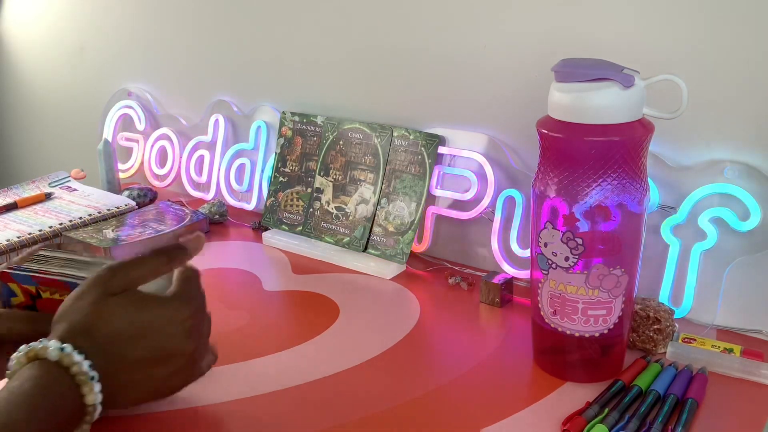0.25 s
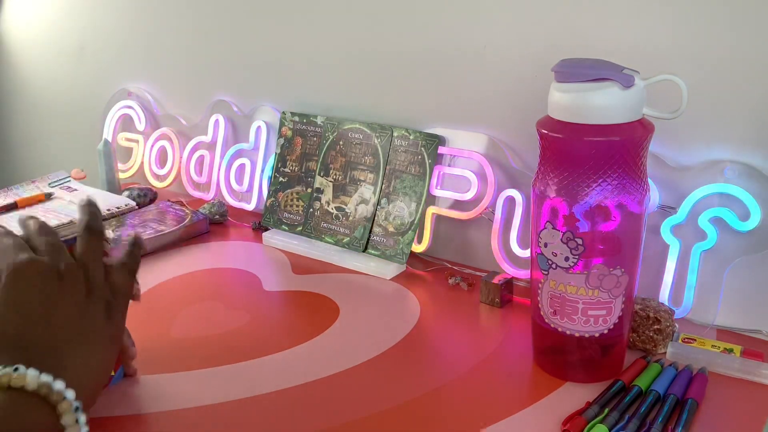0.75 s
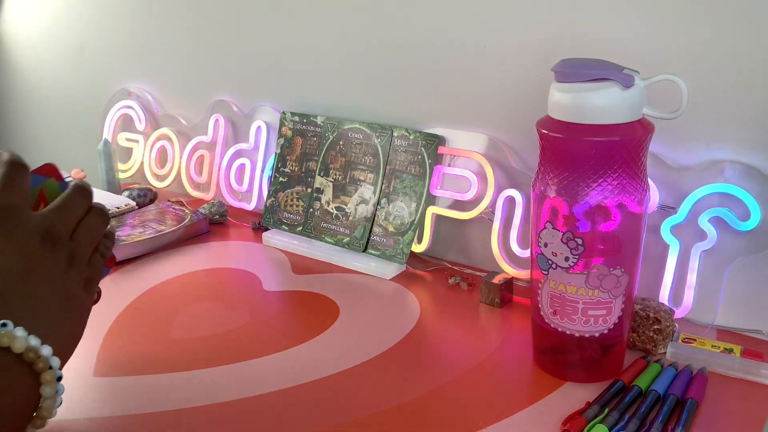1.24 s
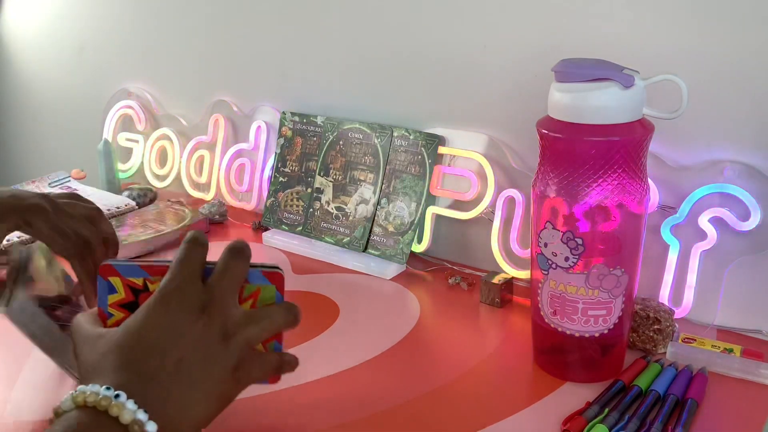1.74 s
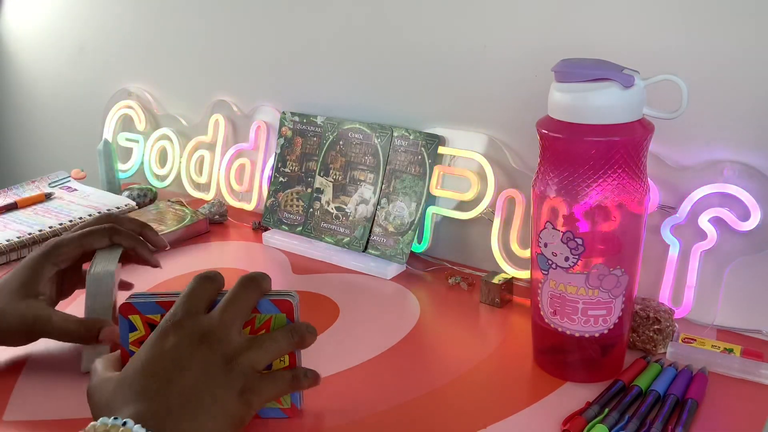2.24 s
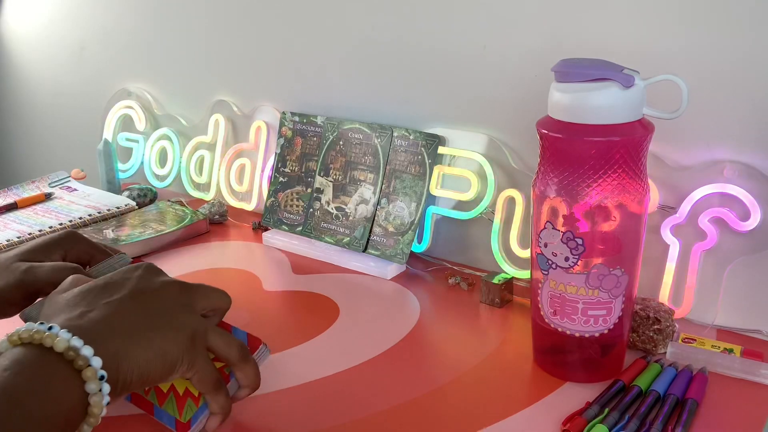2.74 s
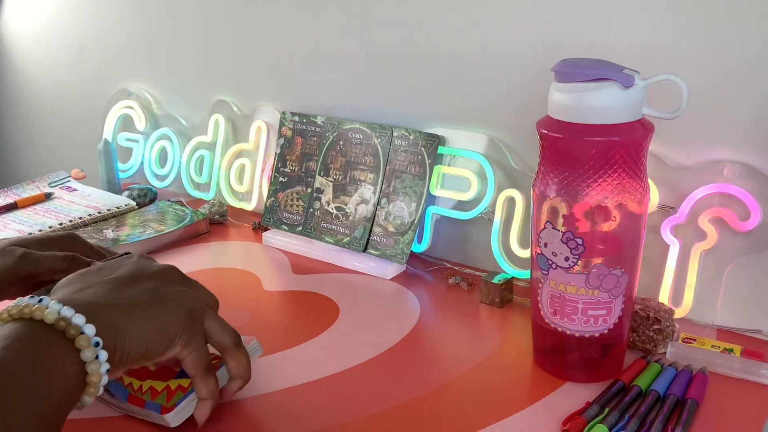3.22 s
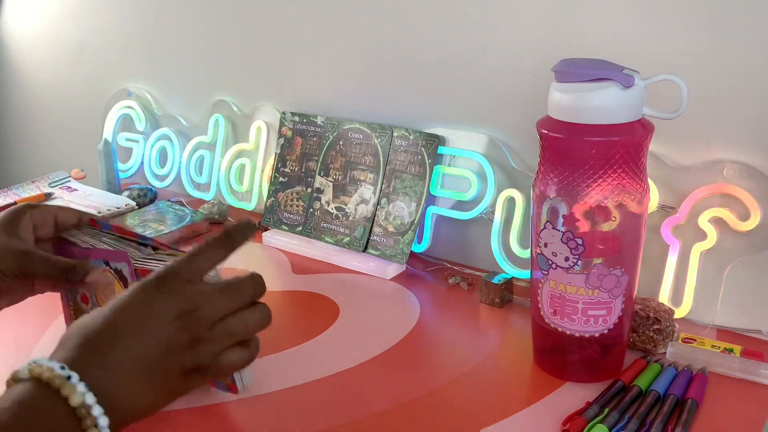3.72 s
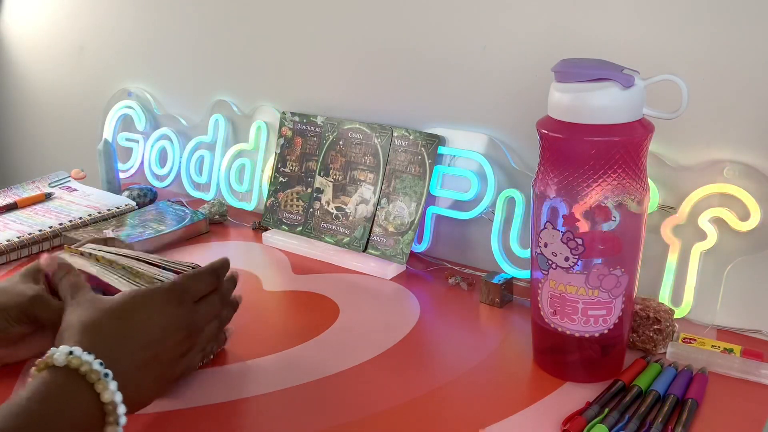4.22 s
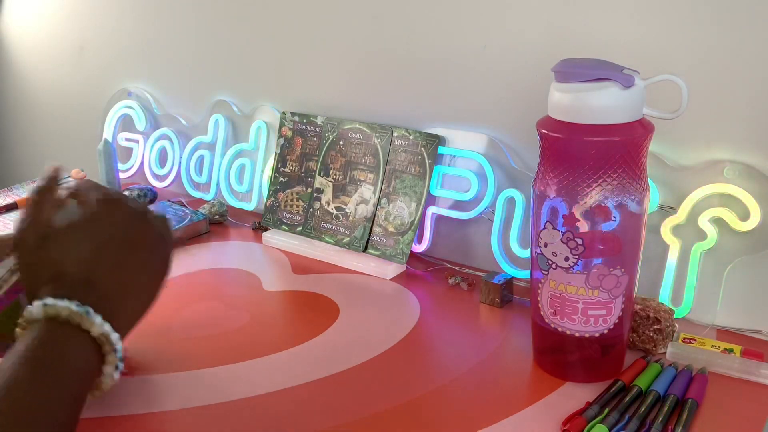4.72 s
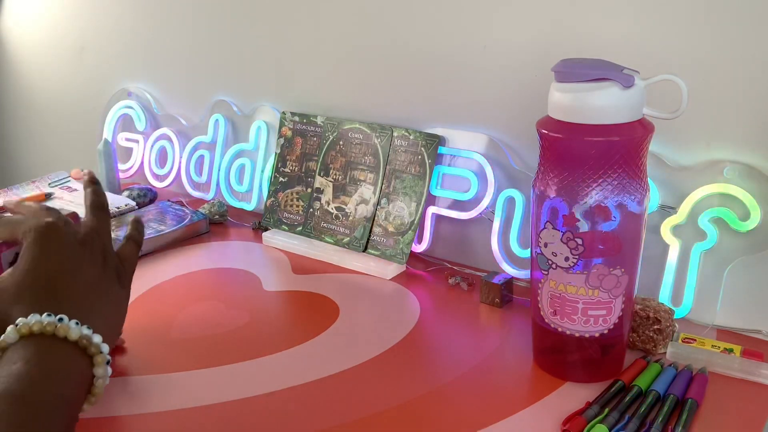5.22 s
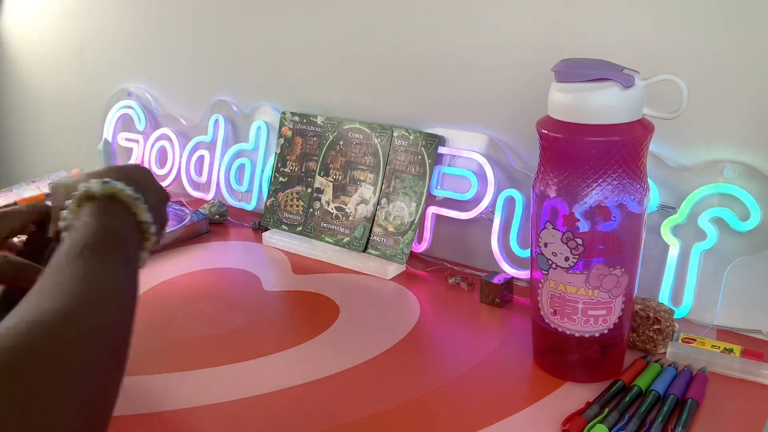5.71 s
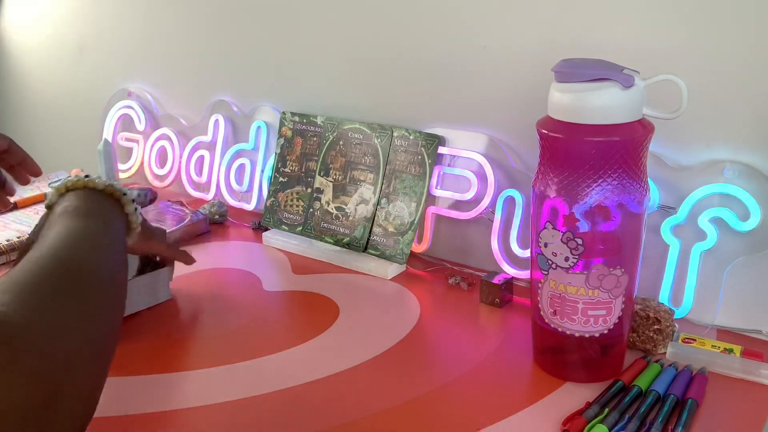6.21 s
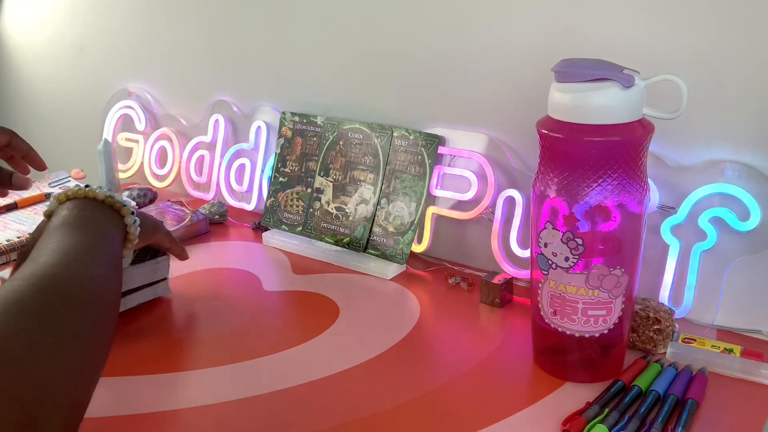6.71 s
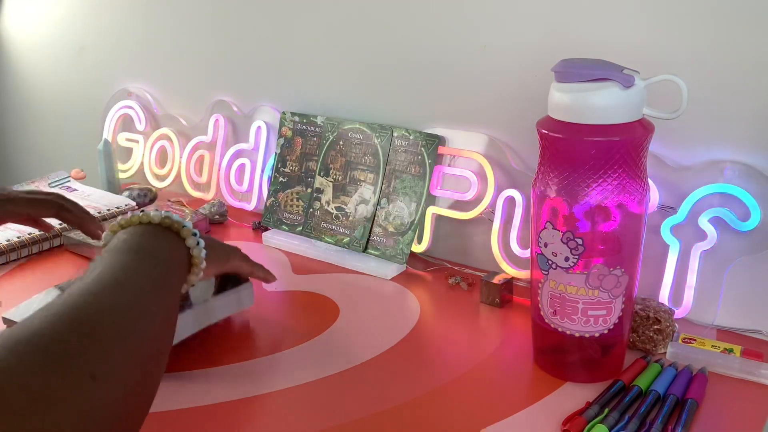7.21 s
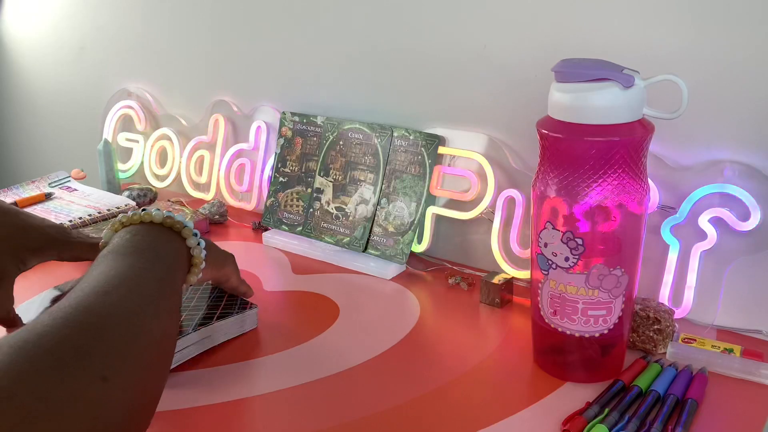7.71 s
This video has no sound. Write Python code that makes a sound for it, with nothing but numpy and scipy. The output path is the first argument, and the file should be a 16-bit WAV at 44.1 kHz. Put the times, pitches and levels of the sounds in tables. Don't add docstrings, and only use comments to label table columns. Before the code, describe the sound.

Cards rub and hiss in the hands, slap together in short cascades, then snap rapidly one after another in a riffle. More slaps and squaring taps follow, with tiny bright bead clicks from a bracelet. After a pause a heavy slap booms the desk top, and the end has isolated wooden thuds and faint scrapes. Close stereo pickup, short room echo, low hum and soft hiss beneath.

```python
import sys
import numpy as np
from scipy import signal
from scipy.io import wavfile
from scipy.ndimage import uniform_filter1d

SR = 44100
rng = np.random.default_rng(int(sys.argv[2]) if len(sys.argv) > 2 else 0)


def how_loud(loudness_db):
    steps = np.asarray(loudness_db, float) / 20
    return 10 ** steps


def unload_audio(sound):
    columns = np.transpose(np.atleast_2d(sound))
    steps = np.round(np.clip(columns, -1, 1) * 32767)
    wavfile.write(sys.argv[1], SR, steps.astype(np.int16))


N = 350595
CARD_LAG, BEAD_LAG, RIFFLE_LAG = 3, -8, -1


def evened(x):
    return x / np.sqrt(np.mean(x ** 2) + 1e-20)


def peaked(x):
    return x / abs(x).max()


def read(points, hz):
    f, value = np.transpose(points)
    return np.interp(np.log(hz + 1), np.log(f + 1), value)


def resonated(x, hz, q):
    return signal.lfilter(*signal.iirpeak(hz, q, SR), x)


def add(mix, start_s, sound, pan_db=0., lag=0):
    for ear, side in zip(mix, (1, -1)):
        first = round(start_s * SR) + (lag if side > 0 else 0)
        part = ear[max(first, 0):][:len(sound)]
        part += how_loud(side * pan_db / 2) * sound[:len(part)]


def click(points, size=1024):
    hz = abs(np.fft.fftfreq(2 * size, 1 / SR))
    log_gain = np.log(how_loud(np.maximum(read(points, hz), -100)))
    h = np.fft.ifft(np.exp(np.conj(signal.hilbert(log_gain)))).real[:size]
    return h / np.linalg.norm(h)


def ring(modes, size=22000):
    t = np.arange(size) / SR
    return peaked(sum(how_loud(db - 60 * t / t60) * np.sin(2 * np.pi * hz * t) for hz, db, t60 in modes))


def grit(lumps_db, size=N):
    lumps = np.minimum(rng.exponential(1, size // 24 + 1), 4)
    force = np.repeat(how_loud(lumps_db * lumps), 24)[:size]
    return evened(force * rng.standard_normal(size))


def cascade(spread_s, rise_s, lumps_db):
    t, lead_s = np.arange(4096) / SR, 4 * rise_s
    crowding = np.exp((t - lead_s) / rise_s)
    thinning = np.exp(-np.maximum(t - lead_s - 0.37 * spread_s, 0) / spread_s)
    end_fade = signal.windows.tukey(4096, .1) ** (t > .04)
    return lead_s, grit(lumps_db, size=4096) * np.minimum(crowding, thinning) * end_fade


def gesture(start_s, hold_s, level_db, swell_db_per_s, fade_db_per_s):
    t = np.arange(0, N, 64) / SR
    swell = swell_db_per_s * np.maximum(start_s - t, 0)
    return level_db - swell - fade_db_per_s * np.maximum(t - start_s - hold_s, 0)


def strongest(gestures):
    level_db = np.max([gesture(*g) for g in gestures], 0)
    return how_loud(np.interp(np.arange(N), np.arange(0, N, 64), level_db))


# freq_hz [Hz], density_db [dB per Hz]
AIR_SPECTRUM = [(15, -30), (25, -13.5), (74, -2), (177, -18.5), (245, -23.5), (288, -32.5), (1830, -48.5),
                (4480, -51.5), (14800, -49), (16500, -67.5)]
# freq_hz [Hz], likeness [0-1]
AIR_LIKENESS = [(60, 0.93), (240, 0.89), (950, 0.48), (3770, 0.06), (15000, 0.99)]


def air():
    frames, hz = N // 512 + 5, np.fft.rfftfreq(2048, 1 / SR)
    a, b, c, d, drift = rng.standard_normal((frames, 1025, 5)).T
    drift = evened(uniform_filter1d(uniform_filter1d(drift, 20, 0), 8, 1))
    same, left = read(AIR_LIKENESS, hz)[:, None], a + 1j * b
    right = same * left + np.sqrt(1 - same ** 2) * (c + 1j * d)
    z = np.array([left, right]) * how_loud(read(AIR_SPECTRUM, hz)[:, None] + 0.51 * drift)
    return how_loud(-60) * evened(signal.istft(z, nperseg=2048, noverlap=1536)[1][:, :N])


# peak_s [s], flex_db [dB],
# palm_rub_db [dB], swell_db_per_s [dB/s], fade_db_per_s [dB/s]
STROKES = [
    (0.0, -37, -49.5, 100, 114),
    (.8, -49.5, -60, 300.5, 90),
    (1.9, -63.5, -53, 65.5, 30.5),
    (3.04, -35.5, -44, 247.5, 43.5),
    (3.24, -35.5, -35, 171, 106.5),
    (4.05, -44.5, -50.5, 40.5, 46),
    (4.37, -49, -57.5, 28, 72.5),
    (5.24, -47, -59, 300.5, 102),
    (6.12, -68, -57, 60.5, 61.5),
    (7.95, -86, -58, 85.5, 100),
]
# start_s [s], hold_s [s], hiss_db [dB], swell_db_per_s [dB/s], fade_db_per_s [dB/s]
DRAGS = [(.01, 0.29, -60, 300, 482), (.45, .2, -67.5, 248, 56), (.8, 0.043, -59, 150, 86),
         (1.58, 0.0074, -54, 460, 256), (2.03, 0.0042, -53, 147, 294.5), (2.135, .11, -69, 900, 201.5),
         (2.31, 0.051, -66.5, 605, 94), (2.545, 0.041, -65, 695.5, 196.5), (2.87, 0.56, -35, 739, 240),
         (3.45, .01, -45, 499.5, 24), (3.97, 0.0025, -26, 229.5, 285), (4.21, 0.0091, -35, 282, 208),
         (4.44, .21, -57.5, 699, 192), (4.8, 0.13, -67, 100, 367.5), (5.12, 0.24, -68, 313.5, 356.5),
         (5.95, 0.074, -55, 326, 201)]
# freq_hz [Hz], density_db [dB per Hz]
RUB = [(120, -27), (300, -5), (600, -6), (900, -10), (1500, -27.5), (4000, -53)]
# freq_hz [Hz], density_db [dB per Hz]
FLEX = [(150, -19), (300, -3), (600, 1), (1000, -1.5), (1600, 0), (2400, -6.5), (3200, -20), (5000, -41.5),
        (9000, -74.5)]
# freq_hz [Hz], density_db [dB per Hz]
EDGE = [(900, -30.5), (2500, -2.5), (4000, -4), (8000, 3.5), (12000, 2.5), (16000, -5.5), (18000, -35)]
# freq_hz [Hz], level_db [dB], t60_s [s]
TOP = [(94, -9, 0.29), (137, 5.5, 0.079), (227, 1.5, 0.054), (278, -11.5, 0.19), (323.5, -8.5, 0.19),
       (366, -9, 0.15), (539, -11.5, 0.42), (759.3, -13, 0.091)]
# freq_hz [Hz], level_db [dB], t60_s [s]
SWAY = [(53.8, 4.5, 0.26), (56, -2.5, 0.2)]


def slide():
    rub = strongest((s, 0, rub_db, *pace) for s, _, rub_db, *pace in STROKES)
    flex = strongest((s, 0, flex_db, *pace) for s, flex_db, _, *pace in STROKES)
    hiss = strongest(DRAGS)
    desk = ring(TOP) + 0.15 * ring(SWAY)
    shake = evened(signal.oaconvolve(grit(1.4) * rub, desk)[:N])
    out = how_loud(6.0) * shake * np.std(rub) * np.array([[how_loud(.7)], [how_loud(-.7)]])
    for level, colour, lumps_db, apart in ((rub, RUB, 3., .45), (flex, FLEX, 4., .8), (hiss, EDGE, 2.8, .4)):
        shared, left, right = (signal.oaconvolve(grit(lumps_db), click(colour))[:N] for _ in range(3))
        ports = np.array([np.roll(shared, -2), shared]) + apart * np.array([left, right])
        out = out + how_loud(-3.5) * level * ports
    return out


# freq_hz [Hz], density_db [dB per Hz]
CRACK = [(1200, -24), (2600, -5.5), (4000, -0.5), (6000, -9.5), (9000, -16.5), (16000, -34)]


def land(out, start_s, level_db, pitch_hz, crack_db, spread_s, q, rise_s):
    lead_s, drive = cascade(spread_s, rise_s, lumps_db=3.5)
    body = signal.fftconvolve(drive, click(FLEX))
    body = signal.lfilter(*signal.butter(2, 8.1 * pitch_hz, fs=SR), body)
    body = peaked(0.28 / q * body + resonated(body, pitch_hz, q))
    crack = peaked(signal.fftconvolve(drive, click(CRACK)))
    sound = how_loud(level_db - 3.0) * (body + how_loud(crack_db + 3.0) * crack)
    add(out, max(start_s - lead_s, 0), sound, -.8, CARD_LAG + rng.integers(-1, 2))


# start_s [s], level_db [dB peak], pitch_hz [Hz], crack_db [dB re touch]
TOUCHES = [(0.004, -30.5, 970, 2), (1.549, -39.5, 1050, -16), (1.585, -31.5, 624, -14),
           (2.197, -27.5, 1330, -36), (2.299, -37, 540, -43), (2.55, -44.5, 445, -29),
           (3.535, -32, 1325, -3), (4.385, -34, 579, -18), (4.456, -24.5, 1031, -13.5),
           (5.484, -45, 704, -5), (5.673, -53, 740, -2), (5.722, -34, 1000, -17.5), (6.02, -21, 720, -17),
           (6.759, -27, 510, -27), (7.261, -30, 576, -23), (7.28, -25, 405, -40), (7.706, -45.5, 777, -11)]


def touches():
    out = np.zeros((2, N))
    for row in TOUCHES:
        land(out, *row, spread_s=0.012, q=1.63, rise_s=.001)
    return out


# start_s [s], level_db [dB peak], pitch_hz [Hz], crack_db [dB re slap], spread_s [s]
SLAPS = [(0.057, -26.5, 1790, -10, 0.021), (0.686, -13.5, 1688, -15, 0.0089),
         (0.693, -7, 1640, -24, 0.0055), (0.704, -7, 855, -27.5, 0.0054), (1.752, -20, 1100, -22.5, 0.02),
         (1.774, -17, 1300, -16.5, 0.01), (1.784, -17.5, 1590, -4, 0.0065),
         (1.807, -29.5, 1170, -8.5, 0.015), (1.924, -9, 1600, -20, 0.011), (1.962, -28, 2200, -2.5, 0.006),
         (1.983, -19, 910, -19.5, 0.0045), (2.034, -18.5, 2390, -10, 0.0053),
         (3.711, -10.5, 1010, -28, 0.011), (3.728, -14, 920, -31, 0.012), (3.846, -11, 2380, -6.5, 0.0054),
         (3.86, -4, 1330, -6.5, 0.027), (3.895, -19, 1370, -18, 0.022), (3.939, -12, 1710, -6, 0.027),
         (4.106, -28, 1100, -6, 0.01), (4.121, -21.5, 1580, -7, 0.015), (4.149, -20.5, 1600, -4.5, 0.006),
         (4.175, -22, 1070, -17, 0.01), (4.186, -20, 1100, -9, 0.012), (4.202, -12.5, 1800, -3, 0.005),
         (4.215, -17, 1590, -5, 0.007), (4.232, -16.5, 1500, -10, 0.008), (4.247, -23.5, 910, -21, 0.009),
         (4.268, -34, 1200, -7, 0.008), (4.344, -19, 1530, -15.5, 0.0063), (5.08, -7, 766, -27, 0.016),
         (5.113, -6.5, 780, -22, 0.0074), (5.125, -12, 960, -17.5, 0.01)]


def slaps():
    out = np.zeros((2, N))
    for row in SLAPS:
        land(out, *row, q=1.3, rise_s=.0025)
    return out


# start_s [s], level_db [dB peak], sway_db [dB re blow], spot_hz [Hz]
THUDS = [(0.061, -36.5, -13, 154.3), (0.506, -47.5, -26, 124), (0.704, -21.5, -8.5, 130),
         (1.561, -32.5, -4.5, 129), (1.592, -24, -7.5, 131), (1.755, -28, -10.5, 137),
         (1.924, -34, -9, 380), (2.195, -39, -15, 146), (2.548, -45.5, -5, 198), (2.59, -40, -4.5, 140),
         (2.68, -52, 1, 110), (2.894, -24.5, -18.5, 190), (3.024, -21.5, -17, 380),
         (3.139, -21, -18.5, 166), (3.248, -19.5, -33.5, 139.6), (3.37, -19, -20, 350),
         (3.717, -26.5, -11.5, 132), (3.873, -17.5, -16.5, 220), (4.235, -28, -14.5, 132),
         (4.45, -40.5, -10, 111.6), (4.533, -38.5, -17, 390), (4.821, -43, -23, 137),
         (5.086, -18, -18, 137), (5.719, -30.5, -7, 124), (5.759, -33, -19.5, 272),
         (6.023, -10.5, -14, 216), (6.061, -23, -12, 317), (6.765, -20, -20, 139.6),
         (7.284, -19, -16.5, 129.8), (7.718, -40.5, -8, 135.3), (7.868, -56, -6, 111)]


def thuds():
    out, top, sway = np.zeros((2, N)), ring(TOP), ring(SWAY)
    onset_s = .055
    sway = peaked(sway * (1 - np.exp(-(np.arange(len(sway)) / SR / onset_s) ** 2)))
    stiff = signal.butter(4, 105., "high", fs=SR, output="sos")
    contact_s = .0021
    for start_s, level_db, sway_db, spot_hz in THUDS:
        push = np.convolve(np.hanning(int(contact_s * SR) + 3), cascade(.007, .001, lumps_db=3.5)[1])
        knock = signal.sosfilt(stiff, signal.fftconvolve(top, push)[:len(top)])
        knock = peaked(.5 * knock + resonated(knock, spot_hz, 1.8))
        blow = how_loud(level_db - 5.5) * knock + how_loud(level_db + sway_db - 0.7) * sway
        add(out, start_s - .007, blow, 1.5)
    return out


# start_s [s], level_db [dB peak], answer_delay_s [s]
BEADS = [(0.0657, -29, 0.0053), (0.2, -34.5, .0235), (0.259, -45, 0.017), (0.168, -43, .05),
         (0.277, -48, .027), (0.4315, -32, 0.0055), (0.4533, -34, 0.037), (0.459, -22.5, 0.0078),
         (0.564, -43.5, 0.025), (0.651, -43, 0.0045), (0.693, -43, .0065), (0.8008, -40, .018),
         (0.792, -42, 0.013), (0.8243, -35.5, 0.2), (1.552, -40.5, 0.037), (1.751, -34.5, .036),
         (2.454, -46, 0.0056), (4.195, -28.5, 0.009), (4.4424, -37, .031), (4.449, -33, 0.0064),
         (4.54, -34, 0.02), (4.5663, -41, 0.04), (4.5812, -38, 0.0087), (4.613, -49, 0.0066),
         (4.636, -43, .021), (4.7666, -32.5, 0.013), (5.0815, -49, .03), (5.0867, -46, 0.033),
         (5.236, -47, 0.025), (5.496, -42.5, .006), (5.585, -52.5, .01), (5.8258, -48, 0.059),
         (4.7592, -32, 0.01), (4.7747, -33, 0.012), (4.9596, -39, 0.008), (5.1963, -44, .01),
         (5.2708, -40, 0.013), (5.3378, -45, 0.32), (5.483, -43, .0194), (5.7297, -43, 0.011),
         (5.8154, -44, 0.014), (6.7523, -40.5, .012), (7.0173, -58, 0.011), (7.3378, -44, .006),
         (7.8318, -59, 0.01), (7.8543, -56, 0.0096), (2.134, -47, .008), (2.302, -53.5, 0.014)]
# freq_hz [Hz], density_db [dB per Hz]
BEAD = [(1500, -33), (4000, -18.5), (7500, 1), (11500, 4), (15000, 7), (18000, -26)]


def beads():
    out, bead = np.zeros((2, N)), click(BEAD)
    answer_db = -10.5
    for start_s, level_db, delay_s in BEADS:
        for at_s, knock_db in ((start_s, level_db), (start_s + delay_s, level_db + answer_db)):
            knock = peaked(signal.fftconvolve(cascade(.003, .0002, lumps_db=5.)[1], bead))
            add(out, at_s - .0006, how_loud(knock_db + 2.0) * knock, .6, BEAD_LAG)
    return out


# middle_s [s], length_s [s], level_db [dB], pitch_hz [Hz], width_hz [Hz]
SCRAPES = [(0.498, 0.079, -59.5, 510, 336), (1.242, 0.053, -68.5, 1870, 2540),
           (1.39, 0.054, -66.5, 1620, 1800), (1.544, 0.078, -62, 1195, 910), (2.333, 0.12, -50.5, 900, 870),
           (2.846, 0.096, -45.5, 1470, 2550), (4.525, 0.079, -42.5, 832, 401),
           (4.835, 0.046, -55.5, 587, 500), (5.931, 0.07, -57.5, 1300, 1800),
           (6.748, 0.042, -52.5, 5000, 5000), (7.492, 0.053, -70, 1301, 1192),
           (7.758, 0.084, -52.5, 886, 918), (7.889, 0.14, -48.5, 680, 570)]


def scrapes():
    out = np.zeros((2, N))
    for middle_s, length_s, level_db, pitch_hz, width_hz in SCRAPES:
        slip = grit(2.1, size=8192)
        for _ in range(2):
            slip = resonated(slip, pitch_hz, pitch_hz / width_hz)
        size = int(length_s * SR)
        slip = evened(slip)[-size:] * np.hanning(size)
        add(out, middle_s - size / SR / 2, how_loud(level_db - 5.5) * slip, .5, rng.integers(-4, 5))
    return out


# start_s [s], level_db [dB peak], pitch_hz [Hz],
# t60_s [s]
PINGS = [(.503, -47, 510, .05), (1.53, -58, 1300, 0.11), (1.548, -50, 1280, .04), (1.561, -41, 620, 0.037),
         (1.551, -53, 4300, 0.033), (1.596, -55, 4050, .04), (1.912, -45, 4500, 0.054),
         (1.926, -31, 3800, 0.059), (1.926, -19, 1540, .07), (1.985, -38.5, 3300, .04),
         (2.838, -35, 4200, 0.022), (4.121, -34, 1600, 0.037), (4.149, -29.5, 1400, 0.044),
         (5.905, -51.5, 1870, .16), (5.91, -60, 1640, 0.14), (6.021, -26, 720, 0.054),
         (6.205, -47, 540, 0.095), (6.7515, -44.5, 4000, .02), (6.7665, -41.5, 4500, .02),
         (7.262, -30.5, 560, 0.035), (7.283, -24.5, 356, 0.16), (7.283, -28.5, 710, 0.068),
         (7.48, -64, 1198, 0.063), (7.285, -24, 135.4, 0.2), (6.765, -24, 140, .21), (6.024, -21, 215, .08),
         (6.05, -34, 323, 0.24), (5.1, -22.5, 140, .22), (2.3, -45, 700, .05)]


def pings():
    out = np.zeros((2, N))
    for start_s, level_db, pitch_hz, t60_s in PINGS:
        note = ring([(pitch_hz, 0, t60_s), (pitch_hz * 1.1, -7, t60_s * 0.76)], size=16384)
        push = cascade(.001, .0002, lumps_db=0.5)[1][:400]
        add(out, start_s, how_loud(level_db) * peaked(np.convolve(note, push)), .3, CARD_LAG)
    return out


# start_s [s], level_db [dB peak], body_db [dB re snap]
RIFFLE = [(2.79, -52, -3), (2.805, -52.5, -5.5), (2.815, -47, -5.5), (2.83, -40.5, -4.5),
          (2.8545, -22.5, -7), (2.8587, -22, -2), (2.8827, -24, 2), (2.9036, -22.5, -22.5),
          (2.9217, -13.5, -8.5), (2.9315, -23.5, -2), (2.9375, -28.5, -3.5), (2.958, -18, -12),
          (2.9648, -12.5, -10), (2.9865, -21.5, -4.5), (2.9965, -23.5, -3.5), (3.0003, -21, -3.5),
          (3.0053, -21, -4), (3.0165, -23.5, -3), (3.026, -20, 2.5), (3.0541, -16, -7.5),
          (3.0612, -10.5, -5.5), (3.0739, -20.5, -6.5), (3.0775, -22, -4), (3.0885, -20.5, -3.5),
          (3.1295, -24.5, -7.5), (3.1325, -17, -5), (3.1495, -16.5, 1.5), (3.1663, -14.5, -1.5),
          (3.1812, -18.5, 3.5), (3.1955, -14.5, -7.5), (3.2035, -20, -9), (3.2288, -26, 0.5),
          (3.2401, -16, -8), (3.2471, -4.5, -5.5), (3.2522, -13, -4), (3.2574, -15, 0.5),
          (3.2622, -18.5, -3), (3.2763, -15, -7.5), (3.289, -20, -5.5), (3.2955, -9.5, -5.5),
          (3.32, -17.5, 2), (3.3345, -14.5, -1), (3.3465, -15.5, -0.5), (3.3585, -26.5, -2.5),
          (3.3657, -13, -12), (3.3713, -4, -6.5), (3.377, -10, -9.5), (3.39, -20, -5), (3.3975, -23, -4),
          (3.404, -19.5, -10), (3.4114, -24, -14), (3.4264, -29, -9), (6.7605, -32.5, 5),
          (7.2792, -26, -13), (3.8455, -20, 0.5), (3.8605, -22.5, 0.5), (7.34, -42, -6.5)]
# freq_hz [Hz], density_db [dB per Hz]
SNAP = [(700, -20), (2000, -6), (3500, -3), (5500, -7), (8000, -5), (12000, -4.5), (16000, -7),
        (18000, -23.5)]


def riffle():
    out, body, edge = np.zeros((2, N)), click(FLEX), click(SNAP)
    for start_s, level_db, body_db in RIFFLE:
        snap = peaked(signal.fftconvolve(cascade(.0013, .0002, lumps_db=4.)[1], edge))
        flex = peaked(signal.fftconvolve(cascade(.0035, .0004, lumps_db=5.)[1], body))
        card = how_loud(level_db + 2.5) * (snap + how_loud(body_db) * flex)
        add(out, start_s - .0006, card, -.5, RIFFLE_LAG + rng.integers(-1, 2))
    return out


# freq_hz [Hz], t60_s [s]
WALLS = [(60, 0.53), (400, 0.36), (1100, 0.32), (2900, 0.34), (6000, 0.33), (16000, 0.15)]


def walls(x):
    taps = np.zeros((2, SR // 2))
    at = np.arange(160, SR // 2 - 20, 20) + rng.integers(0, 20, (2, (SR // 2 - 161) // 20))
    np.put_along_axis(taps, at, rng.choice([-1., 1.], at.shape), 1)
    hz, t, z = signal.stft(taps, SR, nperseg=256)
    same = 1 / (1 + (hz[:, None] / 250) ** 2)
    z = np.array([z[0], np.sqrt(same) * z[0] + np.sqrt(1 - same) * z[1]])
    decay = how_loud(-60 * t / read(WALLS, hz)[:, None])
    tail = signal.istft(z * decay, SR, nperseg=256)[1]
    return signal.fftconvolve(x[None], tail / np.linalg.norm(tail[0]), axes=1)[:, :N]


def scene():
    cards = slaps() + touches() + riffle() + scrapes()
    wrist, desk = beads(), pings() + thuds()
    sent = how_loud(-5.0) * cards + how_loud(-4.5) * wrist + how_loud(-7) * desk
    return cards + wrist + slide() + desk + walls(sent.mean(0)) + air()


def thinned(x):
    hole_db, waver_db, hole_above_hz = -3.2, 1.6, 4400
    full_above_db, full_db = -41, -3.
    hz, t, z = signal.stft(x, SR, nperseg=1024)
    power = uniform_filter1d(abs(z) ** 2, size=3, axis=2).mean(0)
    band, block = np.arange(len(hz)) // 8, np.arange(len(t)) // 2
    steps = uniform_filter1d(power, size=8, axis=0)[np.minimum(band * 8 + 4, 512)][:, block * 2]
    around = uniform_filter1d(power, size=71, axis=0)
    waver = evened(uniform_filter1d(rng.standard_normal((len(t), 65)), size=5, axis=0))
    waver = np.clip(waver[block * 2][:, band // 4].T, -3, 1)
    loud = power[hz > 8000].sum(0) > how_loud(2 * full_above_db)
    limit_db = hole_db + full_db * loud - 3 * (hz[:, None] < 8000) + waver_db * waver
    hole = (steps < how_loud(2 * limit_db) * around) & (hz[:, None] > hole_above_hz)
    return signal.istft(z * ~hole, SR, nperseg=1024)[1][:, :N]


def low_pass(x):
    return signal.sosfilt(signal.butter(12, 16990, fs=SR, output="sos"), x)


# freq_hz [Hz], width_hz [Hz], depth_db [dB]
TREBLE_DIPS = [
    (5542, 240, -9),
    (9576, 1300, -9.5),
    (13200, 1500, -11),
]


def record(dry):
    hz = np.fft.rfftfreq(1024, 1 / SR)
    dips_db = sum(db * np.exp(-(2 * (hz - f) / width) ** 2) for f, width, db in TREBLE_DIPS)
    ports = signal.firwin2(511, hz, how_loud(dips_db) * (hz < 15850), fs=SR)
    cut = signal.sosfilt(signal.butter(6, 38., "high", fs=SR, output="sos"), dry)
    side = 0.65 * resonated(cut[0] - cut[1], 2900, 1.2) / 2
    cut = cut + np.array([side, -side])
    mix = thinned(signal.oaconvolve(cut, ports[None], "same"))
    return low_pass(mix)


dry = scene()
out = record(dry)
unload_audio(out)
```